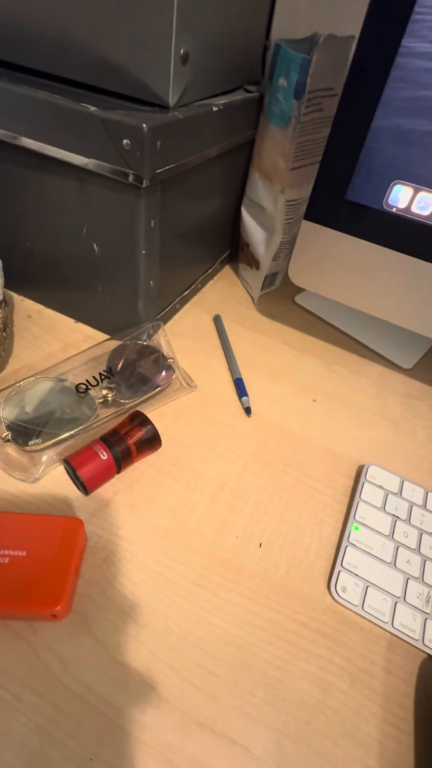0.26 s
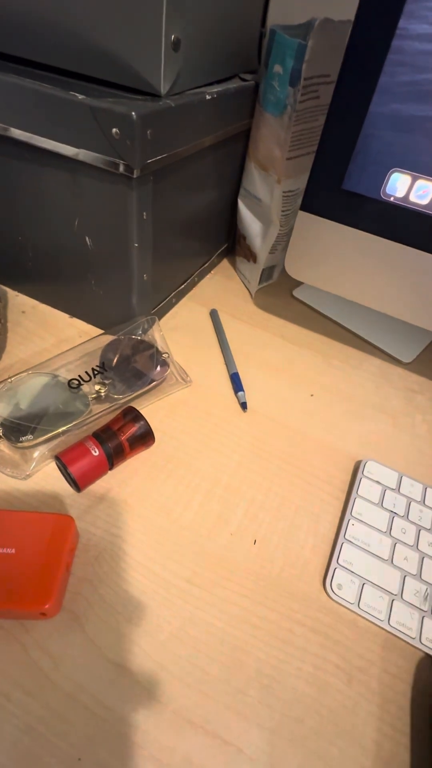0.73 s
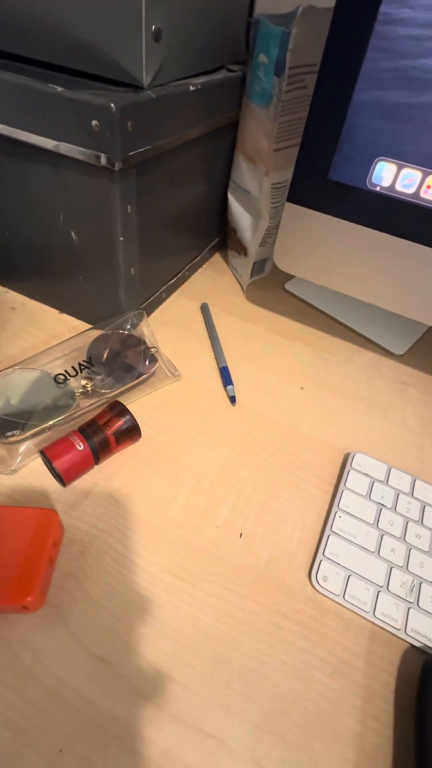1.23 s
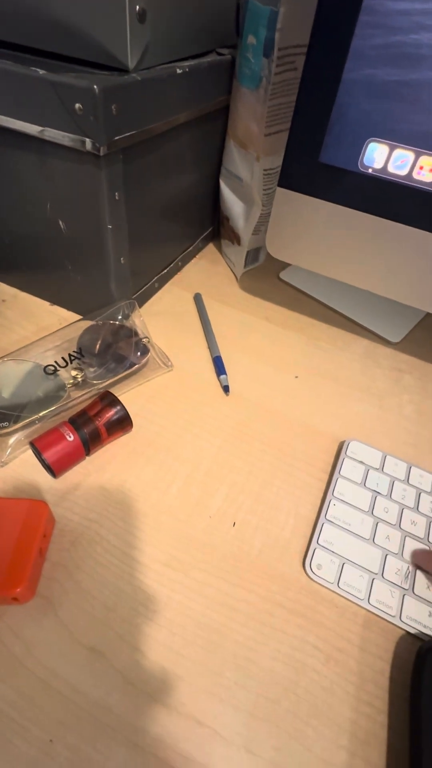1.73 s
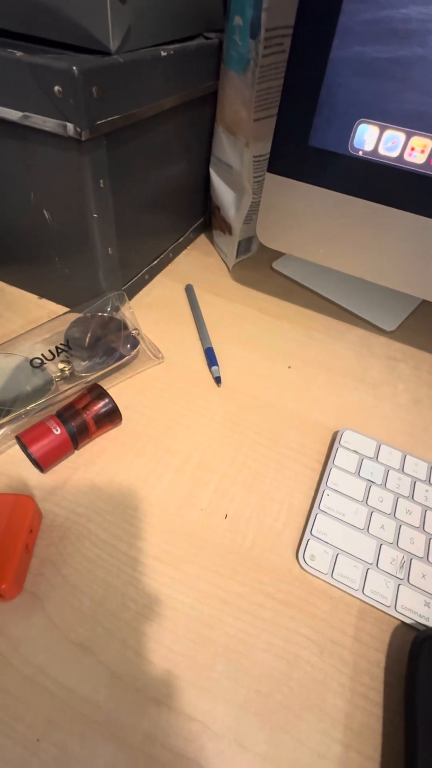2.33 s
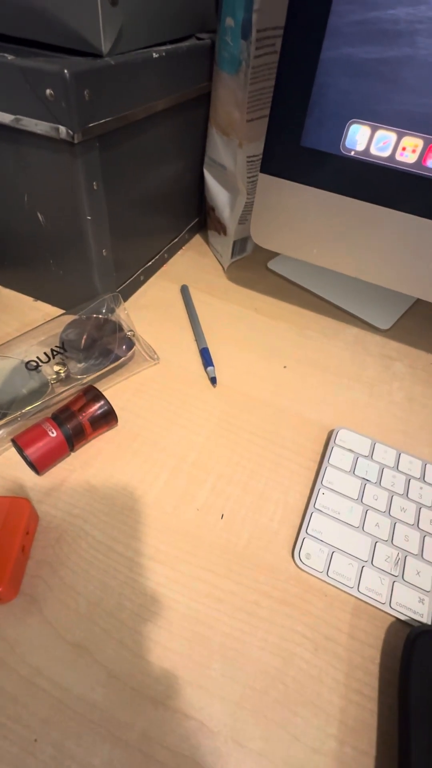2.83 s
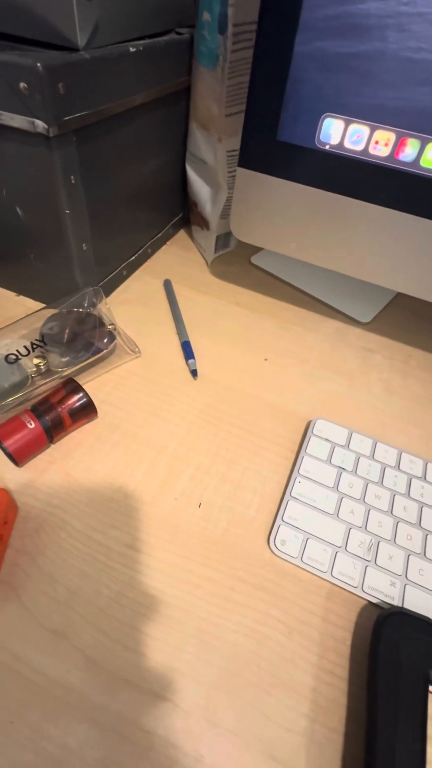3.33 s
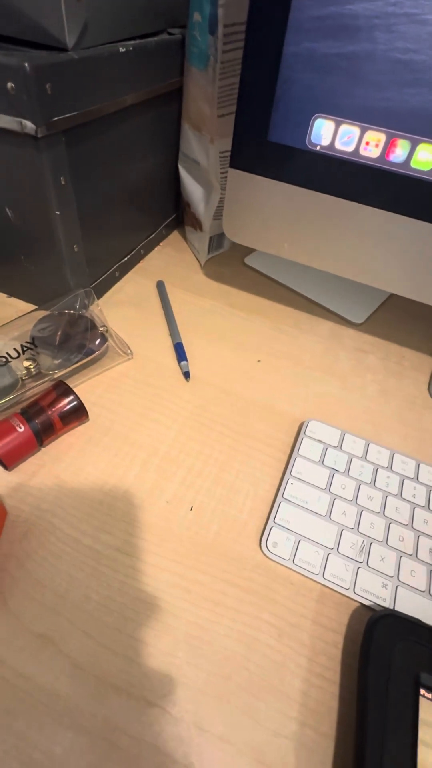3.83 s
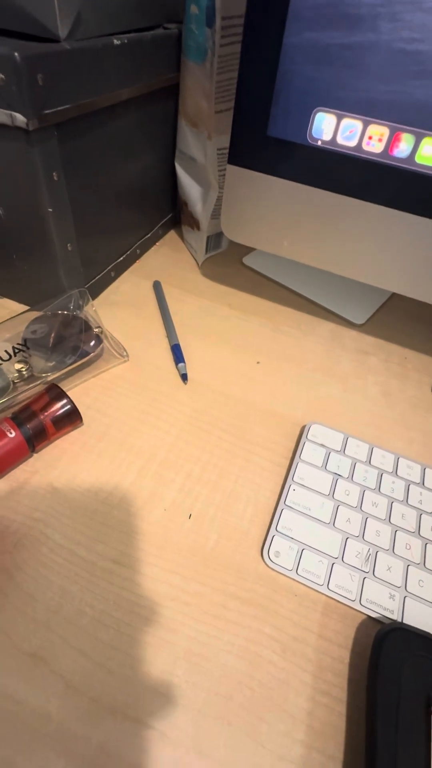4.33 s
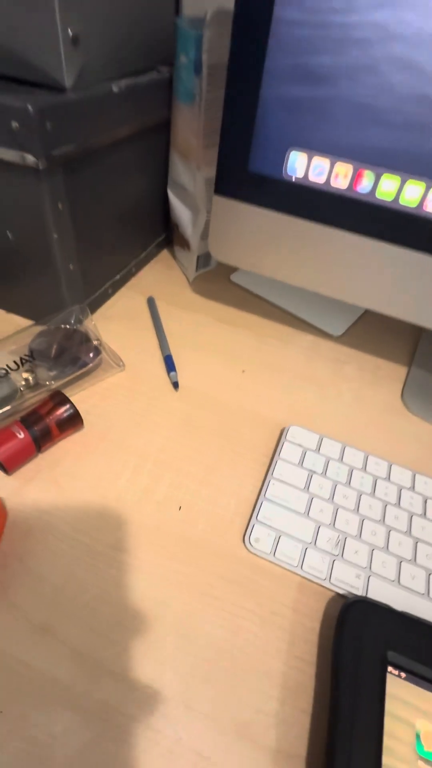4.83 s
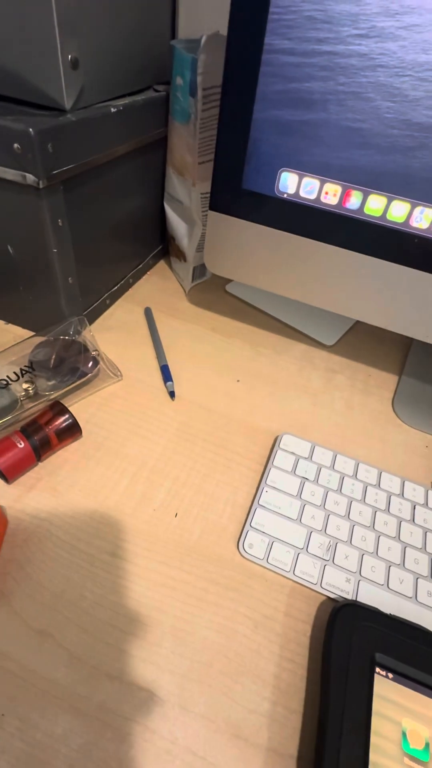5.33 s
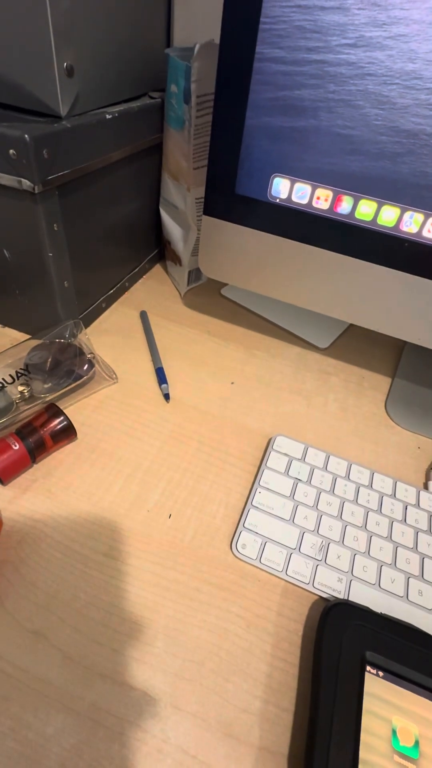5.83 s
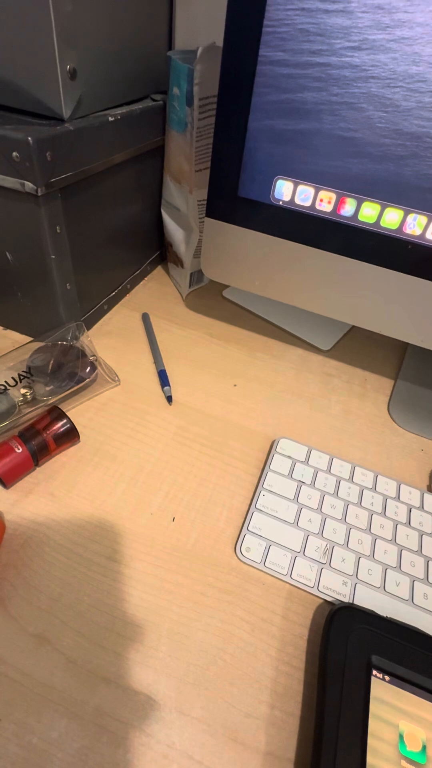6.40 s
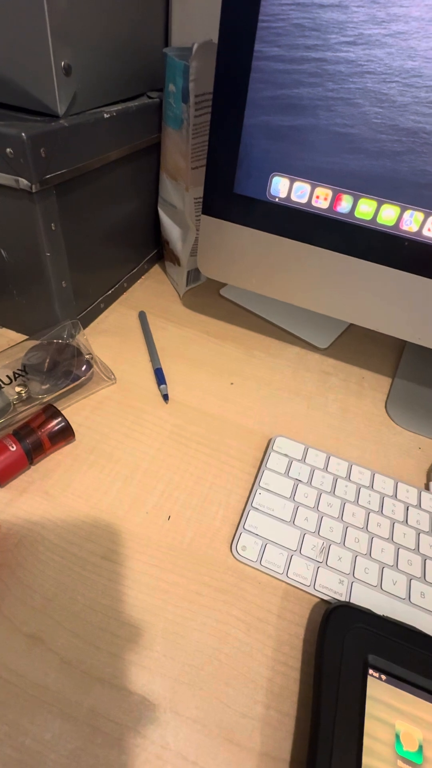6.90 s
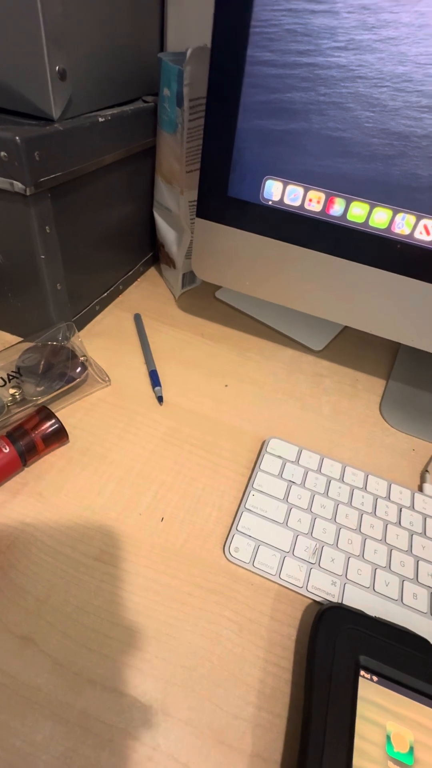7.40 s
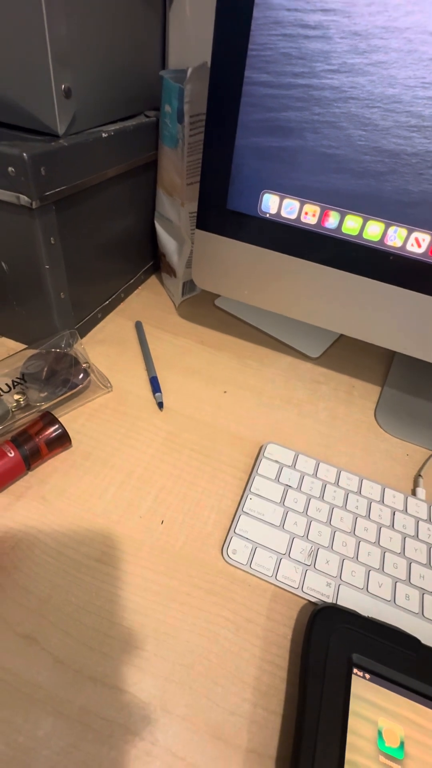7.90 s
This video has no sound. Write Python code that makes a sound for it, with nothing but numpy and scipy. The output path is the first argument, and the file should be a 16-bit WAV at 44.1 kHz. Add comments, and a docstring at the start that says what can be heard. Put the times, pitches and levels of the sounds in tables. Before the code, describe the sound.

Light, irregular key clicks on a thin keyboard at a wooden desk, then a fast burst of typing, over a faint low appliance hum.

```python
"""Light typing on a thin keyboard.

The keyboard lies on a wooden desk in a small quiet room, heard at two close microphone ports.
Each tick is a few decaying noise bursts within milliseconds, with cap resonances and an afterglow.
Struck modes ring the case and thump the desk; swells of grainy noise are fingers sliding over the keys.
A dull noise scuff repeats farther off, over an appliance: wavering sine hum, noise rumble and faint hiss."""
import sys
import numpy as np
from scipy import signal
from scipy.fft import rfft, irfft, next_fast_len
from scipy.io import wavfile

SR = 44100
rng = np.random.default_rng(int(sys.argv[2]) if len(sys.argv) > 2 else 0)


def put_to_file(sound):
    """Save the sound as 16-bit audio at rate SR, in the file named by the first command-line argument."""
    columns = np.atleast_2d(sound).T  # one column per channel
    safe = np.clip(columns, -1, 1)
    whole_steps = np.round(safe * 32767)
    wavfile.write(sys.argv[1], SR, whole_steps.astype(np.int16))


N = 359395  # samples

# All levels in the tables are relative: each source has its own mixing gain besides.
# key ticks, press or release: start_s, level_db, rattle_ms, body_db (300 to 3400 Hz), pitch_hz
KEY_TICKS = [(0.0994, -56, 5.5, 0, 8850), (0.526, -40.5, 3, -10, 9500), (0.5314, -34, 2.9, 5, 5450),
             (0.619, -45, 3.8, -10, 7220), (0.633, -39, 7.3, 5, 7760), (0.963, -52, 13, -16, 9200),
             (1.1435, -40.5, 5.7, 10, 5550), (1.3341, -34.5, 5.5, 4, 6300), (1.4227, -26.5, 8.1, -16, 6300),
             (1.667, -30.5, 9.7, 5, 6850), (1.7205, -48, 6, 9, 5100), (1.7454, -46.5, 5.5, 4, 5150),
             (1.9372, -42, 4.9, 7, 5960), (1.9432, -34.5, 5.8, 6, 4900), (2.05, -41.5, 8.4, 6, 5940),
             (2.196, -24, 3.7, 7, 3960), (2.272, -40.5, 5.6, 4, 3960), (2.344, -36.5, 6.3, 8.5, 8800),
             (2.4427, -42.5, 7, 9.5, 5130), (2.6315, -26.5, 8.1, 2.5, 7350), (2.7103, -46, 1.9, 3, 5200),
             (2.995, -38.5, 7.2, 9.5, 7060), (3.171, -39, 8, -3, 4200), (3.3474, -30, 2.5, -16, 5800),
             (3.4255, -59, 7.3, -5, 7210), (3.447, -37, 1.7, -24, 8200), (3.667, -30, 9.7, 8, 8800),
             (3.7468, -36.5, 3.2, -2, 6760), (4.041, -39, 16, 14, 7900), (4.108, -44, 8, 12, 5000),
             (4.143, -40.5, 13, 19, 7550), (4.212, -50, 5.2, 19, 4200), (4.2253, -39.5, 2.4, 7, 8460),
             (4.3738, -44, 3.9, 6.5, 4330), (4.636, -50.5, 6.5, 2, 6330), (4.9563, -47.5, 7.6, 16, 5290),
             (5.248, -42, 2, 12, 3680), (5.324, -45.5, 8.1, 14.5, 3640), (5.3538, -30.5, 9.8, 12, 9340),
             (5.468, -28, 11.2, -13, 5180), (5.846, -53, 4.8, 4, 6400), (5.879, -41.5, 7.9, 10, 4000),
             (5.899, -28.5, 4.6, 6, 9100), (5.9611, -24, 8.8, -7, 4830), (6.0509, -29.5, 5.8, -3, 9200),
             (6.123, -25.5, 7.8, 2, 5360), (6.1943, -29, 5.2, 1, 9200), (6.282, -25.5, 4.9, -9, 5330),
             (6.338, -30, 4.8, 6, 4590), (6.416, -26.5, 5.4, -4, 5340), (6.53, -29.5, 4.2, -3, 8800),
             (6.6164, -51.5, 9.8, 13.5, 3820), (6.6367, -47, 7.4, 4, 9000), (6.6515, -26.5, 6.6, -2, 5470),
             (6.732, -47, 10, 10.5, 3710), (6.7542, -29, 4.9, 10, 9000), (6.83, -25.5, 6.4, 9, 5660),
             (6.9146, -29.5, 4.6, 8, 8900), (7, -26.5, 5.8, 0.5, 5500), (7.0688, -30, 6.7, 9.5, 5960),
             (7.1392, -26, 3.7, 2.5, 5600), (7.4185, -53, 8.6, 19, 6100), (7.5293, -61, 15, 22, 4940),
             (7.595, -33.5, 4.6, -12, 4900), (7.6654, -48, 6.5, 7, 5100), (7.6858, -25.5, 5.1, -10, 5160),
             (7.7815, -46, 3.6, 10, 4630), (7.844, -31, 6.9, -16, 4960), (7.9899, -27, 7, -9, 4970)]
# keys bottoming out, which rings the case: start_s, level_db, low_db (lift of the modes under 800 Hz)
KEY_BOTTOMS = [(1.6712, -51, 0), (1.944, -47.5, -5), (2.1965, -63, 14), (3.352, -54.5, 7.5),
               (3.6698, -55, -10), (4.048, -51.5, 5.5), (4.26, -59, 18), (4.6399, -49.5, -9),
               (4.9657, -44.5, -12), (5.247, -47.5, -24), (5.325, -57, 3), (5.3647, -35, -0.5),
               (5.469, -46, -10), (5.4866, -45.5, 0), (5.5714, -46.5, -20), (5.8465, -51.5, -22),
               (5.8702, -47, -7), (5.8842, -49.5, 2), (5.909, -37.5, -6), (5.9708, -31, -9.5),
               (6.0416, -41.5, 0.5), (6.1349, -33.5, -10), (6.188, -40.5, -3.5), (6.2811, -54, 12),
               (6.325, -40, -13), (6.341, -44.5, 0), (6.4312, -33.5, -12), (6.505, -46, -6),
               (6.5309, -42.5, 1.5), (6.664, -34, -6), (6.7622, -39, 0.5), (6.8428, -29, -12),
               (6.8695, -39.5, 3.5), (6.921, -37.5, -1.5), (6.997, -51, 4), (7.015, -35, -11),
               (7.0536, -40.5, -6), (7.0774, -35, -5.5), (7.151, -50, 9.5), (7.202, -43.5, -10),
               (7.4853, -51, -7.5), (7.5964, -53.5, 5.5), (7.667, -49, -0.5), (7.6964, -42, -5.5),
               (7.8489, -47, 3)]
# blows carried into the desk top: start_s, level_db, high_db (lift of the modes over 180 Hz)
DESK_THUMPS = [(0.536, -36.5, -0.5), (0.637, -39.5, 3), (1.426, -46.5, 7), (1.677, -29, -1.5),
               (1.956, -33.5, -11), (2.207, -31, -2), (2.359, -34, -27), (2.463, -41.5, -21),
               (2.635, -26, -6), (3.01, -34, -17), (3.348, -43, -4), (3.675, -30, 4), (4.058, -39.5, -4),
               (4.157, -32.5, -4), (4.256, -39, -6), (5.898, -40.5, -5), (5.97, -44.5, -9),
               (6.131, -52, -8), (6.282, -36, -5), (6.419, -48, 10), (6.658, -40.5, -1), (6.836, -38.5, 5),
               (7.001, -49, -4), (7.14, -47.5, 9.5), (7.69, -42, 4.5), (7.985, -46.5, 4.5)]
# fingers sliding over the keys: fullest_s, rise_s, fall_s, level_db, treble_db
FINGER_SLIDES = [(.19, 0.11, 0.073, -80.5, -9), (1.2, 0.068, 0.081, -74, 0),
                 (3.22, 0.078, 0.062, -82.5, -3), (4.724, 0.14, 0.13, -60.5, 0.5),
                 (5.01, 0.086, 0.11, -64, 2.5), (5.225, 0.18, 0.097, -72, -11),
                 (7.289, 0.092, 0.15, -55, 4), (7.5, 0.15, 0.12, -78.5, 0.5)]
# far scuffs: start_s, level_db, t60_s (of the knock), grit_db
FAR_SCUFFS = [(0.553, -39.5, 0.3, -1), (1.762, -37, 0.29, -5.5), (2.93, -38.5, 0.28, -10.5),
              (4.106, -37.5, 0.34, -5.5), (5.362, -46.5, 0.076, -16), (6.84, -44.5, 0.31, -5),
              (7.891, -37.5, 0.32, -9.5)]
# resonances of a plastic cap: pitch_hz, level_db, t60_s
CAP_MODES = [(2700, -33, .008), (4210, -3.5, 0.0089), (4910, -7, 0.026), (5500, -4, 0.048),
             (6670, 12, 0.0029), (8660, -7.5, 0.017), (10100, -29, 0.028), (16740, -26, 0.012)]
# modes of the case: pitch_hz, level_db, t60_s
CASE_MODES = [(311.5, -1, 0.059), (463, -4, 0.036), (634, -12.5, 0.076), (930, -9, 0.023),
              (1061, -3.5, 0.03), (1126, 3, 0.022), (1174, 1, 0.007), (1970, -6, 0.0034), (2420, 1, 0.017)]
# modes of the desk top: pitch_hz, level_db, t60_s
DESK_MODES = [(68.9, 2.5, 0.24), (104.6, 2.5, 0.15), (124.4, -0.5, 0.39), (231.1, 0.5, 0.12),
              (280, 0, 0.04), (410.4, -4.5, 0.053)]
# motor lines of the appliance: pitch_hz, level_db
HUM_LINES = [(33.4, -75.5), (50.1, -66), (66.8, -59.5), (100.15, -57.5), (230, -70.5), (400.5, -73.5),
             (633, -88.5)]
# spectral shapes, one list for the sum of the ports and one for the difference:
# frequency_hz, density_db (relative, per Hz)
TICK_SPECTRA = ([(530, -48), (900, -39), (1980, -6), (3570, -14), (4080, -6.5), (4560, -1.5), (5220, -13.5),
                 (8230, -4), (9770, 1), (11700, -19), (15200, 8.5), (16200, -0.5), (17000, -39)],
                 [(530, -50), (900, -57), (1710, -33), (2720, -27), (4290, -24), (5220, -16), (8230, -25),
                 (10100, -5.5), (11700, -26), (12800, -3.5), (15200, -17), (16200, -15), (17000, -36)])
GLOW_SPECTRA = ([(600, -4), (900, -2.5), (1900, 0.5), (3500, 0.5), (4400, 1), (5000, 4), (5700, 8.5),
                 (6500, 6), (7600, -3.5), (9600, 1), (11000, -34), (13100, -56), (14200, -11), (15300, 0.5),
                 (16200, -14), (17000, -41)], [(530, -7), (900, -7), (1530, -15), (1930, -22), (2130, -10),
                 (4450, -14), (4970, -3.5), (6510, -10.5), (15200, -7.5), (16200, -36.5), (17000, -72)])
SLIDE_SPECTRA = ([(290, -45), (500, -15.5), (633, -5), (790, -9.5), (1160, 1), (1890, -16), (2420, -8),
                  (4310, -14.5), (4920, -15), (9560, -25), (10300, -25), (10800, -103), (13800, -51),
                  (15800, -21), (17000, -70)], [(290, -44), (500, -13), (1180, -6), (1910, -24),
                  (2420, -12), (3940, -20), (5140, -22), (6510, -26.5), (12800, -25), (15800, -23),
                  (17000, -65)])
SCUFF_SPECTRA = ([(210, -6), (350, 2), (605, -3), (733, -5.5), (838, 0), (1410, -11.5), (2290, -4.5),
                  (6840, -22), (9610, -26), (12000, -83), (15600, -99), (22000, -120)], [(210, -14),
                  (350, -23), (755, -8), (971, -23), (1190, -13.5), (1430, -30), (2430, -15), (4260, -27.5),
                  (12000, -33), (15600, -58), (22000, -120)])
RUMBLE_SPECTRA = ([(20, -33), (31, -29), (40, -21.5), (50, -9.5), (58, -16.5), (85, -21.5), (122, 5),
                   (150, -11.5), (195, -15), (240, -8), (290, -12.5), (372, -24.5), (440, -23.5),
                   (520, -61), (700, -88)], [(13, -43), (22, -12.5), (37, -31), (53, -11.5), (97, -1.5),
                   (152, -11), (410, -7.5), (468, -22), (520, -12.5), (680, -57), (1140, -120)])
HISS_SPECTRA = ([(400, -27), (500, 0), (560, -6), (650, -1.3), (800, -7.5), (1100, -12), (1500, -16.5),
                 (2900, -20), (6000, -24.5), (8900, -31), (9800, -19), (10150, -13.5), (10800, -68),
                 (17000, -22)], [(400, -27), (520, -2.2), (700, -4), (1100, -15), (1700, -26.5),
                 (2550, -21.5), (3300, -28.5), (8500, -35), (10100, -16.5), (10800, -30.5), (17000, -44)])

# rules for a tick of usual strength, and their change per dB of extra strength
USUAL_TICK_DB = -35
GLOW_DB, GLOW_PER_DB = -28, -0.0351  # afterglow against the tick: soft ticks are wetter
LEAD_DB, LEAD_PER_DB = 3.5, -0.2058  # extra level of the first touch
TOP_DB, TOP_PER_DB = 0, 0.03  # level above 11.5 kHz against the rest, nearly the same for all ticks
GLOW_PER_MS = 0.22  # dB per ms over 6 ms: a longer rattle leaves more afterglow
GLOW_T60_S, WALL_T60_S = 0.24, 0.44
LOWER_TONE_RATIO, LOWER_TONE_DB = 0.59, -8.5  # second, lower resonance of the hollow under a cap
CASE_TOP_DB = -7  # the soft landing excites the modes over 1.5 kHz less
SLIDE_RING_DB = -27  # share of the friction that rings the case
SCUFF_STEADY_S, GRIT_T60_SHARE = 0.017, 0.86  # the grit of a scuff dies sooner than its knock
RUMBLE_DB, HISS_DB = -56.5, -80  # relative, before the mixing gains
CUTOFF_HZ = 17200


def amp(db):
    """Logarithmic level: 20 dB is a factor of ten in amplitude."""
    return 10 ** (np.asarray(db) / 20)


def balance(first_db):
    """Level difference between the ports: the first port gets the gain, the second its inverse."""
    return amp([[first_db], [-first_db]])


def spikes(seconds, sizes):
    """Impulse excitation: single samples at the given moments."""
    out = np.full(N, 1e-18)
    samples = np.clip((np.ravel(seconds) * SR).astype(int), 0, N - 1)
    np.add.at(out, samples, np.ravel(sizes))
    return out


def fade(x, t60):
    """Exponential decay: every sample leaves a trail that falls 60 dB in t60 seconds."""
    return signal.lfilter([1], [1, -amp(-60 / (t60 * SR))], x)


def ring(clicks, hz, t60):
    """Damped oscillator: a unit click sets a decaying sine of height 1 ringing."""
    radius = amp(-60 / (t60 * SR))
    angle = 2 * np.pi * hz / SR
    return signal.lfilter([0, np.sin(angle)], [1, -2 * radius * np.cos(angle), radius * radius], clicks)


def band(x, low_hz, high_hz):
    """Band limitation by a third-order Butterworth band-pass."""
    sos = signal.butter(3, [low_hz, high_hz], "band", fs=SR, output="sos")
    return signal.sosfilt(sos, x)


def drift(rate_hz):
    """Smoothed random fluctuation of spread 1; the smoothing window lasts about 1/rate_hz seconds."""
    steps_per_s = 30
    steps = rng.standard_normal(int(N / SR * steps_per_s) + 40)
    slow = np.convolve(steps, np.hanning(int(steps_per_s / rate_hz) + 3), "same")
    return np.interp(np.arange(N) / SR * steps_per_s, np.arange(len(slow)), slow / slow.std())


def ports(total, difference, spectra, side_db):
    """Sum and difference of two spaced ports, each coloured; the difference is a quarter cycle off."""
    size = next_fast_len(N + 4096)
    log_hz = np.log(np.arange(1, size // 2 + 2) * SR / size)
    gains = []
    for spectrum in spectra:
        points_hz, points_db = np.array(spectrum).T
        gain = amp(np.interp(log_hz, np.log(points_hz), points_db, -99, -99))
        gains.append(gain / np.sqrt(np.mean(gain ** 2)))  # the spectrum sets the shape only
    mid = irfft(rfft(total, size) * gains[0], size)[:N]
    side = amp(side_db) * irfft(1j * rfft(difference, size) * gains[1], size)[:N]
    return np.array([mid + side, mid - side])


def diffuse(envelope, spectra, side_db):
    """Diffuse field: noise from all round, with sum and difference unrelated."""
    total, difference = envelope * rng.standard_normal((2, N))
    return ports(total, difference, spectra, side_db)


def lumpy(spread_db, length):
    """Random modulation: a gain that is redrawn every length samples."""
    return amp(spread_db * rng.standard_normal(N // length + 1)).repeat(length)[:N]


def by_strength(usual_db, per_db, level_db):
    """Linear strength law: a level that follows the strength of the tick."""
    return usual_db + per_db * (level_db - USUAL_TICK_DB)


def afterglow_db(level_db, rattle_ms):
    """Reverberant share: the afterglow depends on the strength and length of the tick."""
    return by_strength(GLOW_DB, GLOW_PER_DB, level_db) + GLOW_PER_MS * (rattle_ms - 6)


def struck(start_s, peak_db, low_db, high_db, modes, splits_hz, level_db, scatter_db, bounce_s, lag_s=0):
    """Modal excitation: each blow and its weaker bounce strike every mode with random strengths.
    Modes below the first and above the second split are lifted; a lag delays low modes against high."""
    chance = rng.standard_normal((len(start_s), 2, len(modes)))
    when = start_s + bounce_s * (.5 + rng.random((len(start_s), 1))) * [0, 1]
    out = 0
    for k, (hz, mode_db, t60) in enumerate(modes):
        colour_db = low_db * (hz < splits_hz[0]) + high_db * (hz > splits_hz[1])
        blow_db = peak_db + level_db + mode_db + colour_db + scatter_db * chance[:, :, k] + [0, -9]
        clicks = spikes(when + lag_s * (250 / hz - 1), amp(blow_db))
        out = out + ring(clicks, hz, t60) * (-1) ** k  # alternating sign
    return out


def keys():
    """Repeated impact: cap, scissor and dome touch four times within the rattle; the room glows after."""
    start_s, level_db, rattle_ms, body_db, _ = np.transpose(KEY_TICKS)[:, :, None]
    glow_db = afterglow_db(level_db, rattle_ms)
    lead_db = by_strength(LEAD_DB, LEAD_PER_DB, level_db)
    top_db = by_strength(TOP_DB, TOP_PER_DB, level_db)
    chance = rng.random((len(start_s), 8))
    strength = rng.standard_normal((len(start_s), 4, len(CAP_MODES)))
    # the first touch is on time, the later three are jittered
    when = start_s + rattle_ms / 1000 * (np.arange(4) + .6 * chance[:, :4] * [0, 1, 1, 1]) / 4
    touch_db = level_db - 5 * chance[:, 4:] + [-5.5, -4.0, -21.0, -15] + lead_db * [1, 0, 0, 0]
    grit = rng.standard_normal(N)
    room = diffuse(lumpy(0.5, 96), GLOW_SPECTRA, side_db=1.5)
    direct, glow = 0, 0
    # each tick has its own share of body; the middle is fixed and the top follows strength
    shares = ((300, 3400, body_db), (3400, 11500, 0 * start_s), (11500, 19000, top_db))
    for low_hz, high_hz, share_db in shares:
        bursts = fade(spikes(when, amp(touch_db + share_db)), 0.0067) * grit
        direct = direct + band(bursts, low_hz, high_hz)
        for k, (hz, mode_db, t60) in enumerate(CAP_MODES):  # the plastic cap rings briefly
            if low_hz < hz < high_hz:
                cap_db = touch_db + share_db + mode_db - 12 + 5 * strength[:, :, k]
                direct += ring(spikes(when, amp(cap_db)), hz, t60)
        # energy falls twice as many dB as amplitude, hence half the decay time
        energy = spikes(start_s + 0.0025, amp(2 * (level_db + glow_db + 0.55 * share_db)))
        energy = fade(energy, GLOW_T60_S / 2) + amp(10.5) * fade(energy, 0.027)  # near surfaces answer first
        glow = glow + np.sqrt(energy) * band(room, low_hz, high_hz)
    return amp(-6) * ports(direct, direct, TICK_SPECTRA, side_db=4.5) + glow


def key_tones():
    """Cavity resonance: the hollow under each cap sounds a short tone, then a lumpy rattle at its pitch."""
    out, t = np.zeros(N), np.arange(SR // 6) / SR
    noise = rng.standard_normal((len(KEY_TICKS), len(t)))
    lumps = amp(4 * rng.standard_normal((len(KEY_TICKS), len(t) // 200 + 1)))
    lumps = lumps.repeat(200, axis=1)[:, :len(t)]
    radius = np.exp(-np.pi * 500 / SR)  # resonance 500 Hz wide
    for (start_s, level_db, rattle_ms, _, pitch_hz), shake, lump in zip(KEY_TICKS, noise, lumps):
        hit = amp(level_db - 60 * np.clip(t - rattle_ms / 2000, 0, 1) / 0.021)  # holds, then falls
        rattle = amp(level_db + afterglow_db(level_db, rattle_ms) + 14.5 - 60 * t / 0.23) * lump
        excitation = shake * (hit + rattle)
        tone = 0
        for hz, tone_db in ((pitch_hz, 0), (LOWER_TONE_RATIO * pitch_hz, LOWER_TONE_DB)):
            poles = [1, -2 * radius * np.cos(2 * np.pi * hz / SR), radius * radius]
            tone = tone + amp(tone_db) * signal.lfilter([1 - radius, 0, radius - 1], poles, excitation)
        i = int(start_s * SR)
        out[i:i + len(t)] += tone[:N - i]
    return amp(-9.5) * out * balance(.3)


def case():
    """Modal ringing and reverberation: the walls return a duller, smeared copy, different at each port."""
    start_s, level_db, low_db = np.transpose(KEY_BOTTOMS)[:, :, None]
    dry = struck(start_s, level_db, low_db, CASE_TOP_DB, CASE_MODES, (800, 1500),
                 level_db=-4.5, scatter_db=3.5, bounce_s=.006)
    t = np.arange(SR // 4) / SR
    walls = rng.standard_normal((2, len(t))) * amp(-60 * t / WALL_T60_S) * (t > .003)
    wet = signal.fftconvolve(dry[None], walls, axes=1)[:, :N]
    wet = signal.sosfilt(signal.butter(2, 1500, fs=SR, output="sos"), wet)
    return dry * balance(-.8) + amp(-33.5) * wet


def desk():
    """Plate modes under a soft push of about 2 ms: the desk top swings up slowly, low modes last."""
    push = np.hanning(int(0.002 * SR))
    start_s, level_db, high_db = np.transpose(DESK_THUMPS)[:, :, None]
    dry = struck(start_s, level_db, 0, high_db, DESK_MODES, (90, 180),
                 level_db=-14.0, scatter_db=5.5, bounce_s=0.0119, lag_s=0.00701)
    return np.convolve(dry, push / push.sum())[:N] * balance(.6)


def slides():
    """Skin friction: a rounded swell of grainy noise that also keeps the case ringing."""
    t, strokes = np.arange(N) / SR, 0
    for fullest_s, rise_s, fall_s, level_db, treble_db in FINGER_SLIDES:
        moments = [fullest_s - rise_s, fullest_s, fullest_s + fall_s]
        swell = np.sin(np.interp(t, moments, [0, np.pi / 2, np.pi])) ** 3.2
        strokes = strokes + swell * amp(level_db + np.array([[0], [treble_db]]))
    # random slips, on average 600 per second
    slips = fade((rng.random(N) < 600 / SR) * rng.exponential(1, N) + 1e-18, .01)
    dull, bright = (diffuse(s * (.85 + .25 * slips), SLIDE_SPECTRA, side_db=-1.5) for s in strokes)
    drag = strokes[0] * (.5 + slips) * rng.standard_normal(N) + 1e-18
    rung = 0
    for k, (hz, mode_db, t60) in enumerate(CASE_MODES):
        rung = rung + amp(mode_db) * ring(drag, hz, t60) * (-1) ** k
    return band(dull, 200, 4300) + band(bright, 4900, 19000) + amp(SLIDE_RING_DB) * rung


def scuffs():
    """Decay of noise energy: a short gritty rub holds, then its knock and its grit die apart."""
    t, energy = np.arange(N) / SR, 0
    for start_s, level_db, t60, grit_db in FAR_SCUFFS:
        since = t - start_s
        t60s = t60 * np.array([[1], [GRIT_T60_SHARE]])
        fall_db = 120 * np.clip(since - SCUFF_STEADY_S, 0, 2) / t60s  # of energy: 60 dB of amplitude
        energy = energy + (since > 0) * amp(2 * level_db - fall_db + 2 * np.array([[0], [grit_db]]))
    grain = lumpy(2.2, 128)
    knock, rub = (diffuse(np.sqrt(e) * grain, SCUFF_SPECTRA, side_db=-3.5) for e in energy)
    low, high = (signal.butter(3, 1300, kind, fs=SR, output="sos") for kind in ("low", "high"))
    return amp(-10.5) * (signal.sosfilt(low, knock) + signal.sosfilt(high, rub))


def appliance():
    """Periodic and random vibration: motor lines that waver a little, over rumble and faint hiss."""
    t, hum = np.arange(N) / SR, 0
    for hz, level_db in HUM_LINES:
        height = np.sqrt(2) * amp(level_db + 0.99 * drift(0.62))
        cycles = hz * t + rng.random() + 0.022 * drift(0.91)
        hum = hum + height * np.sin(2 * np.pi * cycles)
    rumble = diffuse(amp(RUMBLE_DB + 0.29 * drift(3.3)), RUMBLE_SPECTRA, side_db=-13.5)
    hiss = diffuse(amp(HISS_DB), HISS_SPECTRA, side_db=4.5)
    return hum * balance(.7) + rumble * balance(.6) + hiss


def scene():
    """Superposition: all sources add at the two ports."""
    return keys() + key_tones() + case() + desk() + slides() + scuffs() + appliance()


def record(dry):
    """Low-pass filtering: the top is cut, by at least 70 dB from the cutoff upward."""
    return signal.sosfilt(signal.cheby2(12, 70, CUTOFF_HZ, fs=SR, output="sos"), dry)


dry = scene()
out = record(dry)
put_to_file(out)
```